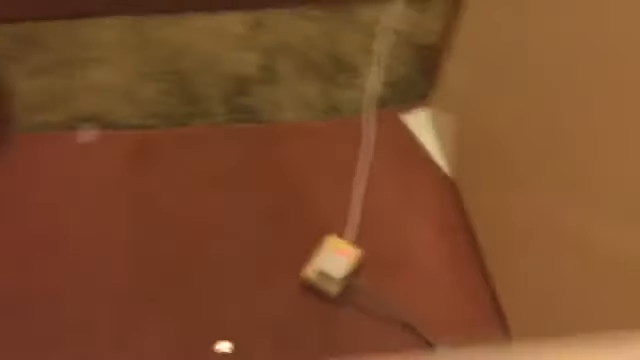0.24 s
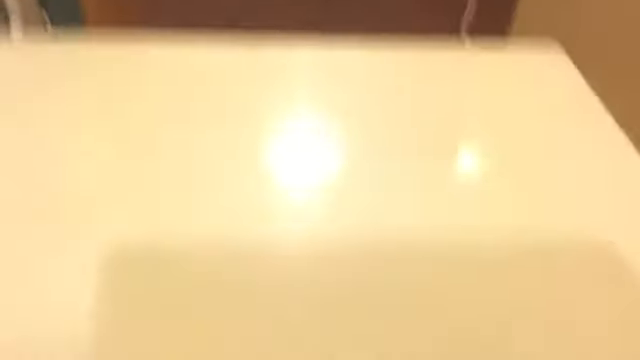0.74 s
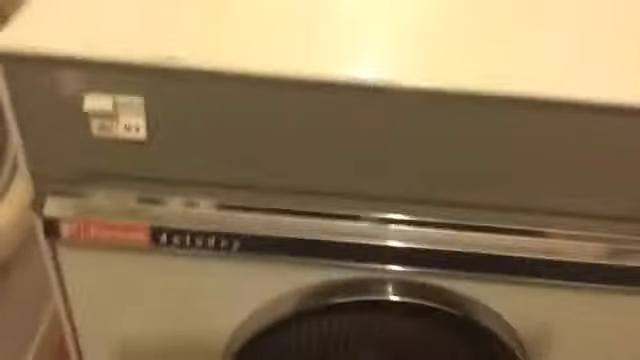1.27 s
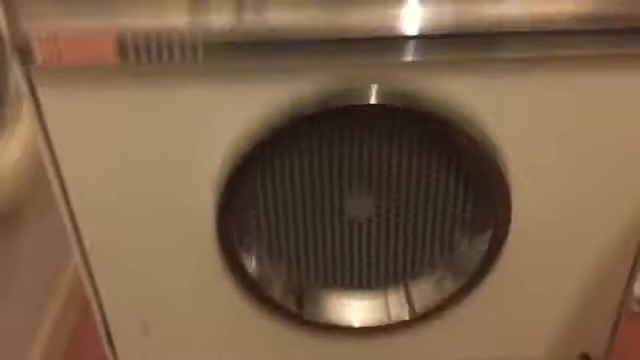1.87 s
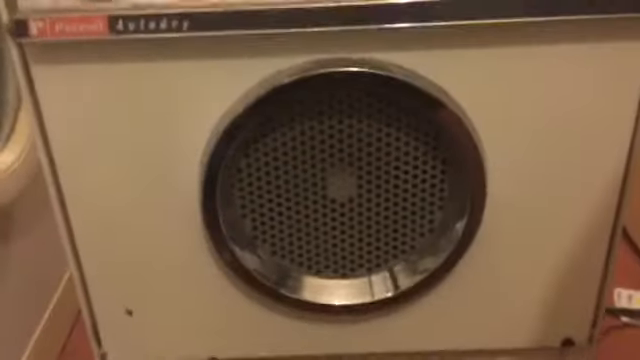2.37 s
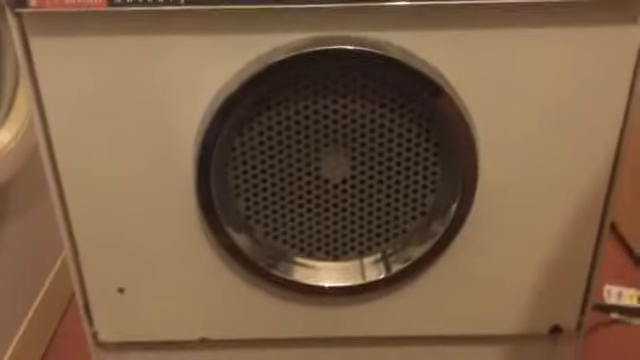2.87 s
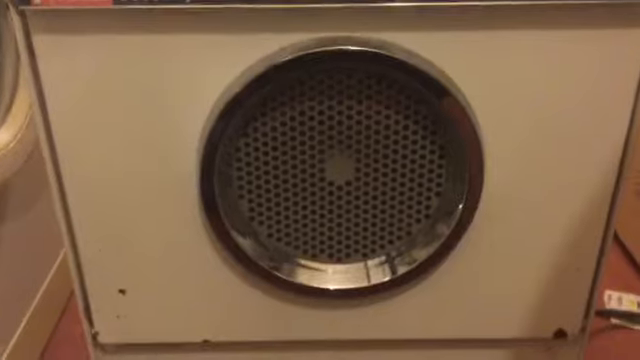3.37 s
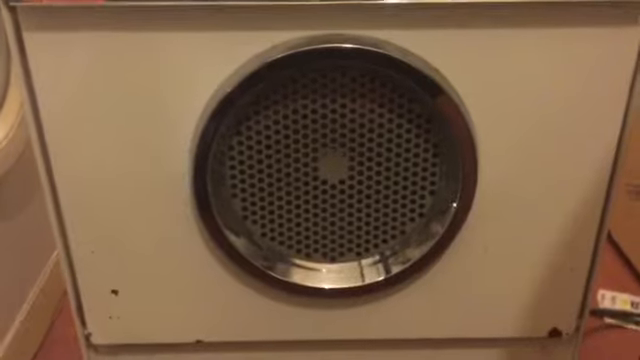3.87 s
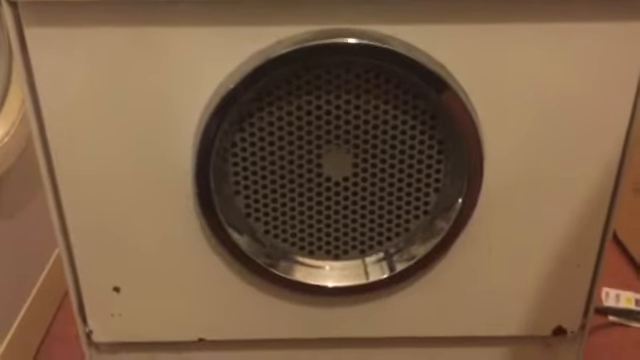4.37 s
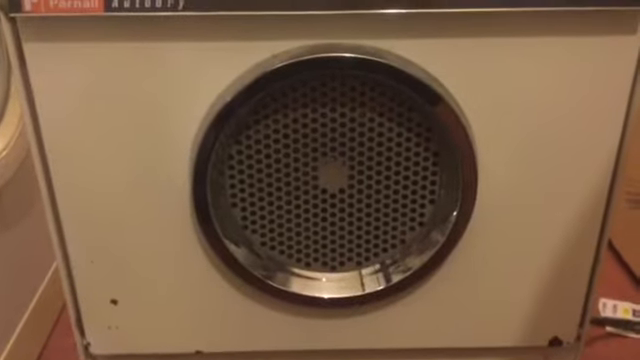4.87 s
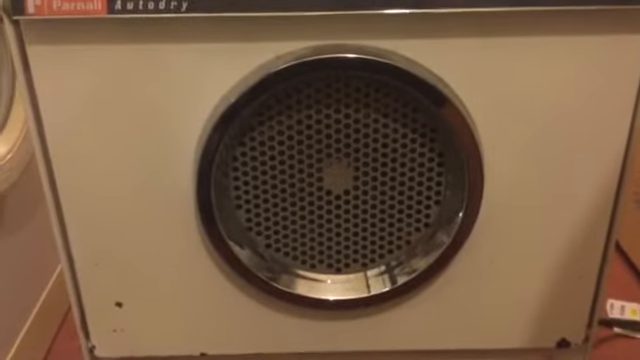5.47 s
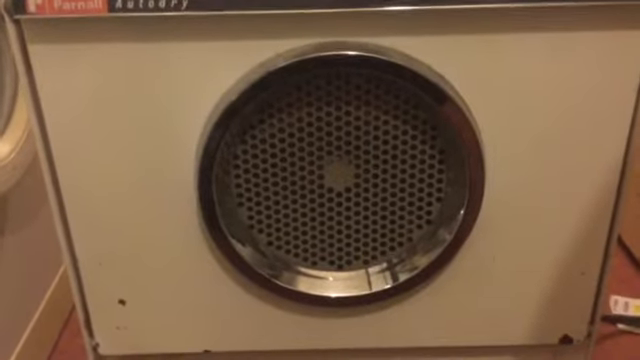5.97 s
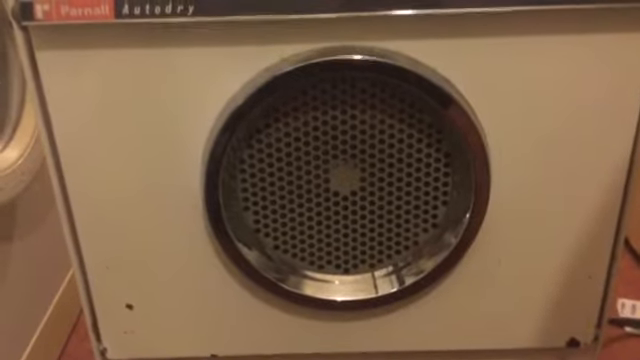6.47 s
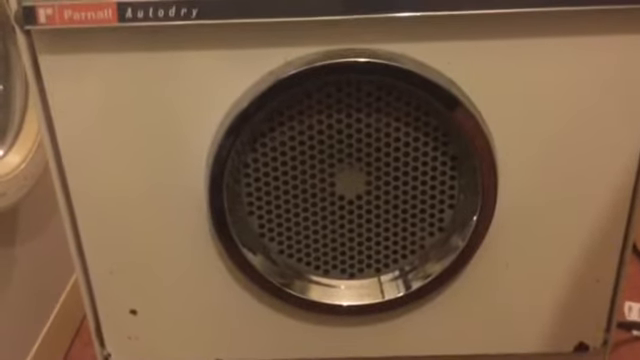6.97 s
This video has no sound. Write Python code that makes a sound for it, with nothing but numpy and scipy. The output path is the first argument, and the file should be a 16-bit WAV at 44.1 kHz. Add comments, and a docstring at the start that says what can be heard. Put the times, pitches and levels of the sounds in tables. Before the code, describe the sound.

A tumble dryer is already running and never stops, picked up close by a handheld phone in a small room. From 0 to 0.3 s soft airy rustles of handling lie over a deep electric hum, strongest near the rear; a low panel tone swells around 0.5 s and drops away by 0.9 s. As the phone comes round, fan air shifts, fine hiss and rattling fasteners rise between 0.8 and 2.4 s, and thin, bright ticks, a soft and a strong one about seven times a second, become clearer. Cloth flops irregularly throughout, with a button click near 2.4 s. By 3 s the sound settles, less hissy. Dull low thuds land near 3.2, 3.6, 5.5 and 5.8 s. Small clicks come at 3.9 and 4.2 s, a hollow note swells briefly at 4.9 s, cloth drops at 5.1 s, a sharper metallic snap pings at 6.3 s, and a fuller flop falls at 7.1 s.

```python
"""A phone is carried from behind a running tumble dryer round to its front, in a small room.
Throughout, summed tones hum, filtered noise gives drum rumble and fan, and noise bursts tick twice a roller turn.
First come rustles of banded noise and a swelling panel tone; then laundry drops as short bursts with struck
modes, while sine-ring buttons snap, fasteners rattle and a fine noise hiss swells until the phone settles.
Later, damped low sines thud from about three seconds, and a hollow note swells past the middle."""
import sys
import numpy as np
from scipy import signal
from scipy.fft import rfft, irfft
from scipy.io import wavfile
from scipy.ndimage import uniform_filter1d

SR = 44100
rng = np.random.default_rng(int(sys.argv[2]) if len(sys.argv) > 2 else 0)


def decibels_to_gain(level_db):
    """Convert a level in decibels to a linear amplitude gain (20 dB per decade)."""
    exponent = np.asarray(level_db, float) / 20
    return 10 ** exponent


def materialize(psi):
    """Save the field psi as 16-bit PCM at rate SR to the path in sys.argv[1].

    A 1-D psi becomes a single channel; in a 2-D psi each row is a channel.
    """
    bounded = np.clip(np.atleast_2d(psi).T, -1, 1)
    quanta = np.round(bounded * 32767).astype(np.int16)
    wavfile.write(sys.argv[1], SR, quanta)


N = 319284
T = np.arange(N) / SR  # [s]


def curves(rows):
    """Interpolate every column after the time column to a value per sample."""
    s, *columns = np.transpose(rows)
    return [np.interp(T, s, c) for c in columns]


def unit(x):
    """Scale to rms 1."""
    return x / np.sqrt(np.mean(x ** 2))


def colour(x, points, modes=()):
    """Filter by (Hz, dB) points, add resonances (Hz, width in Hz, dB), and scale to rms 1."""
    hz = np.arange(len(x) // 2 + 1) * SR / len(x) + 1
    power = 0
    if points:
        point_hz, point_db = np.transpose(points)
        power = decibels_to_gain(np.interp(np.log(hz), np.log(point_hz), point_db)) ** 2
    for f, w, db in modes:
        power = power + decibels_to_gain(db) ** 2 / (1 + (2 * (hz - f) / w) ** 2) ** 2
    return unit(irfft(rfft(x) * np.sqrt(power), len(x)))


def walk(rate):
    """Smooth random wander of rms 1, with a new random target rate times a second."""
    k = int(SR / rate)
    held = rng.standard_normal(N // 20)[np.arange(N) // k]
    return unit(uniform_filter1d(uniform_filter1d(held, k), k))


def bursts(times, peak_db, fade_s, rise_s):
    """Envelope of sudden rises and exponential fades."""
    env = np.zeros(N)
    for s, db, fade in zip(times, peak_db, fade_s):
        start = int(s * SR)
        t = T[start:int((s + 8 * fade) * SR)] - s
        env[start:start + len(t)] += decibels_to_gain(db) * np.exp(-t / fade) * np.clip(t / rise_s, 0, 1)
    return env


def ring(s, hz, db, cycles):
    """A sine struck at s, whose exponential fade has a time constant of the given number of cycles."""
    out = bursts([s], [db], [cycles / hz], 0.00023)
    on = np.flatnonzero(out)
    out[on] *= np.sin(2 * np.pi * hz * (T[on] - s))
    return out


def motor():
    """Magnetic pull and shaft unbalance; the fourth shaft multiple beats slowly against the mains hum."""
    # hum as the phone moves: (time [s], twice-mains hum level [dB], sixth shaft multiple level [dB])
    hum_levels = [(0, -44, -39), (.3, -35, -41), (.65, -38, -42), (1.1, -41.5, -47), (1.8, -42, -51),
                  (2.3, -42, -59), (3, -41, -62), (7.24, -41, -61)]
    # a rear panel rings as the phone passes it: (time [s], level [dB])
    panel_levels = [(0, -60), (.27, -52), (.33, -63), (.45, -53), (.56, -48), (.72, -52), (.85, -64),
                    (1.6, -66), (7.24, -71)]
    # steady motor tones: (times the hum frequency, times the shaft frequency, level [dB])
    steady_tones = [(0, 4, -48.5), (1, 1, -52.5), (0, 5, -59), (1, -1, -62), (1, -2, -60), (0, 7, -63),
                    (0, 8, -64.5), (0, 12, -68)]
    # rotor slot whine: (frequency [Hz], level [dB])
    slot_whine = [(882.9, -79)]
    hum_hz, shaft_hz = 99.95, 24.555  # the hum is at twice the mains
    in_step_s = 3.15  # hum and shaft phases are both zero here
    panel_hz, panel_wander_rad = 224, .88

    hum_phase = 2 * np.pi * hum_hz * (T - in_step_s)
    shaft_phase = 2 * np.pi * shaft_hz * (T - in_step_s)
    hum_db, sixth_db = curves(hum_levels)
    panel_db, = curves(panel_levels)
    out = decibels_to_gain(hum_db) * np.cos(hum_phase)
    out += decibels_to_gain(sixth_db + 0.77 * walk(12.0)) * np.cos(6 * shaft_phase)
    out += decibels_to_gain(panel_db) * np.cos(2 * np.pi * panel_hz * T + panel_wander_rad * walk(2.1))
    for m, k, db in steady_tones:
        level = decibels_to_gain(db + 1.2 * walk(2.04))
        out += level * np.cos(m * hum_phase + k * shaft_phase + .25 * walk(1.6))
    for hz, db in slot_whine:
        out += decibels_to_gain(db + 0.54 * walk(9.9)) * np.cos(2 * np.pi * hz * T + 0.16 * walk(4.7))
    return np.sqrt(2) * out  # makes the tone levels rms levels


def rumble():
    """The drum rolls on its bearings and shakes floor and cabinet panels; its air space sounds a hollow note."""
    # low shake of floor and panels: (frequency [Hz], relative level [dB])
    shake_colour = [(20, -23.5), (35, -11.5), (47, -8), (58, 0), (75, -0.5), (110, 2), (200, -32.5),
                    (1000, -91)]
    # drum roll as the phone comes round to the door: (time [s], level [dB])
    roll_levels = [(0, -46), (1.8, -46.5), (3.5, -44.5), (7.24, -45.5)]
    # broad colour of the roll: (frequency [Hz], relative level [dB])
    roll_colour = [(50, -37.5), (90, -3.5), (130, -0.5), (200, -5), (390, -8), (480, -35.5), (800, -59.5),
                   (2000, -94.5)]
    # cabinet resonances: (frequency [Hz], width [Hz], relative level [dB])
    cabinet_modes = [(100, 26, 8.5), (124, 14, 4), (151.6, 8.1, -2), (174.7, 10, -0.5), (295.2, 14, -9)]
    # swells of the hollow note: (time [s], peak level [dB], width [s])
    hollow_swells = [(4.62, -69, 0.046), (4.87, -58, 0.065)]
    shake_db, hollow_db = -50.5, -72

    shake = decibels_to_gain(shake_db + 2.1 * walk(12)) * colour(rng.standard_normal(N), shake_colour)
    roll_db = curves(roll_levels)[0] + 1.0 * walk(30) + 0.87 * walk(6)
    roll = decibels_to_gain(roll_db) * colour(rng.standard_normal(N), roll_colour, cabinet_modes)
    swell = decibels_to_gain(hollow_db + 2.2 * walk(9))
    for s, db, w in hollow_swells:
        swell = swell + decibels_to_gain(db) * np.exp(-((T - s) / w) ** 2)
    hollow = swell * colour(rng.standard_normal(N), (), [(694, 78, 2.5), (744, 130, -6.5)])
    return shake + roll + hollow


def ticks():
    """A strong and a soft tick every roller turn: grainy metal chatter with a short tail and a dull knock."""
    # strong tick as the phone comes round: (time [s], level [dB])
    tick_levels = [(0, -66), (.45, -77), (1, -66.5), (1.8, -62), (2.2, -65), (7.24, -65)]
    # bright metal colour: (frequency [Hz], relative level [dB])
    metal_colour = [(1500, -44), (3000, -23.5), (6000, -11), (8500, -4.5), (10500, -20.5), (12500, 5),
                    (14500, 6.5), (16000, -8)]
    turn_s, first_tick_s, soft_lead_s = .1439, .0985, .0345
    drift_s, drift_cycle_s, latest_s = .0027, 2.49, 2.19  # ticks drift late and early in a slow cycle
    soft_db, tail_db, knock_below_db = -10.5, -22.5, -9.5
    scatter_db, jitter_s = -2, 0.00072

    s = np.arange(first_tick_s, T[-1], turn_s)
    s = s + drift_s * np.cos(2 * np.pi * (s - latest_s) / drift_cycle_s)
    db = np.interp(s, *np.transpose(tick_levels))
    knock_db = np.r_[db, db] + knock_below_db  # equally heavy under strong and soft ticks
    s, db = np.r_[s, s - soft_lead_s], np.r_[db, db + soft_db]
    late, strong = rng.standard_normal((len(s), 2)).T
    s = s + jitter_s * late
    db = db + scatter_db * strong
    env = bursts(s, db, 0 * s + 0.006, 0.0012)
    env += bursts(s, db + tail_db, 0 * s + 0.05, 0.0079)
    chatter = rng.standard_normal(N) * decibels_to_gain(0.8 * walk(1000))
    knock = bursts(s, knock_db + scatter_db * strong, 0 * s + 0.007, .001)
    return env * colour(chatter, metal_colour) + knock * colour(chatter, (), [(3500, 4600, 0)])


def thuds():
    """The load thuds low in the drum: a couple of cycles of the cabinet's lowest panel."""
    # (time [s], level [dB])
    load_thuds = [(3.185, -30), (3.64, -34), (5.517, -33), (5.846, -32)]
    return sum(ring(s, 94.0, db, 1.3) for s, db in load_thuds)


def drops():
    """Cloth tumbles onto the drum wall in quick rough contacts, with a bright slap and unevenly struck modes."""
    # (time [s], body level before contact offsets [dB], slap level [dB], spread [s], body centre [Hz])
    laundry_drops = [(0.6744, -66, -85, .02, 1100), (0.78, -68, -90, .05, 2400),
                     (0.888, -61, -82, .055, 2000), (1.01, -68, -88, .05, 2600),
                     (1.085, -66, -82, .035, 2300), (1.389, -65, -70, .04, 1200),
                     (1.785, -61, -84, .045, 1400), (1.905, -60, -86, .035, 1850),
                     (2.37, -65, -85, .02, 2200), (2.4307, -65, -73, .02, 900), (2.544, -57, -86, .03, 800),
                     (2.6764, -64, -77, .02, 1900), (2.692, -65, -82, .015, 1900),
                     (2.815, -66, -90, .03, 2000), (3.03, -61, -82, .025, 1700),
                     (3.28, -59, -84, .04, 1450), (3.3972, -64, -85, .03, 1700),
                     (3.44, -64, -90, .035, 1700), (3.483, -65, -90, .02, 1500),
                     (3.692, -64, -88, .012, 2300), (3.8, -67, -82, .02, 2200), (4.2, -65, -84, .02, 1450),
                     (4.222, -56, -74, .03, 1600), (4.3126, -62, -90, .02, 1300),
                     (4.34, -61, -84, .025, 1200), (5.1192, -56, -68, .03, 1500),
                     (5.123, -61, -80, .03, 2900), (5.165, -58, -95, .04, 880), (5.22, -68, -84, .03, 1100),
                     (5.8705, -63, -83, .02, 1300), (6.247, -63, -82, .03, 1500),
                     (6.3699, -64, -78, .03, 1500), (6.515, -61, -84, .03, 1250),
                     (6.9734, -63, -76, .03, 1300), (7.1365, -53, -78, .025, 1700),
                     (7.142, -58, -86, .04, 1000), (7.144, -62, -90, .025, 3000)]
    # drum wall modes: (frequency [Hz], relative level [dB])
    wall_modes = [(870, 6.5), (1000, -3.5), (1170, 4.5), (1390, 1), (1560, -8.5), (1720, -3.5), (1950, -1),
                  (2400, -9.5), (3250, -8.5)]
    rise_s, contact_db, ring_db = .0035, -0.5, -2
    tumble_spread, tumble_octaves = .9, .8  # reach of the contacts in time (in spreads) and pitch
    body_width = 0.57  # over its centre frequency
    off_centre_db = -6.5  # loss of a wall mode an octave from the body centre

    s, db, slap_db, spreads, centre = np.transpose(laundry_drops)
    grain = rng.standard_normal(N) * decibels_to_gain(2.0 * walk(250))
    chance = rng.random((len(s), len(wall_modes), 2))
    contacts = rng.random((len(s), 4, 3))
    out = colour(grain, (), [(4500, 6000, 0)]) * bursts(s, slap_db, 0.6 * spreads, rise_s)
    for when, peak_db, spread, mid, row, touches in zip(s, db, spreads, centre, chance, contacts):
        start = int(when * SR)
        near = slice(min(start, N - 8192), min(start + 8192, N))
        touches = np.r_[[(0, 0, .5)], touches]  # the first contact is on time, full and centred
        for k, (late, weak, pitch) in enumerate(touches):
            hz = mid * 2 ** (tumble_octaves * (pitch - .5))
            after = (k + late) / len(touches) * tumble_spread  # in spreads
            touch_db = peak_db + contact_db - 7.0 * weak - 5.0 * after - 2.5 * (k > 0)
            env = bursts([when + after * spread], [touch_db], [spread / 3], rise_s)
            out[near] += colour(grain[near], (), [(hz, body_width * hz, 0)]) * env[near]
        for (hz, mode_db), (late, weak) in zip(wall_modes, row):
            off_db = off_centre_db * np.log2(hz / mid) ** 2
            struck_db = peak_db + ring_db + mode_db + off_db - 10.0 * weak
            out += ring(when + spread * late, hz, struck_db, 16.0)
    return out


def snaps():
    """Buttons snap on metal: dry broad clicks a millisecond or two long, each with a short ping."""
    # (time [s], click level [dB], ring frequency [Hz], ring level [dB])
    button_snaps = [(.34, -92, 2000, -62), (0.8187, -89, 2690, -57.5), (2.4326, -65, 2900, -58),
                    (3.896, -59.5, 5430, -75), (4.2247, -70, 5370, -59), (4.226, -84, 4100, -65),
                    (4.344, -81, 3550, -64.5), (4.474, -72, 3500, -63), (5.1207, -73, 5300, -65),
                    (6.3333, -63, 3000, -51), (6.333, -80, 1610, -59), (6.373, -74, 3200, -63)]
    s, db = np.transpose(button_snaps)[:2]
    clicks = colour(rng.standard_normal(N), (), [(7300, 33000, 0)]) * bursts(s, db, 0 * s + 0.0022, 0.00024)
    return clicks + sum(ring(when, hz, ring_db, 11) for when, _, hz, ring_db in button_snaps)


def rattles(level_db, count):
    """Many tiny fasteners and seams touch the drum, each ringing a moment at its own pitch."""
    when, pitch, size, cycles = rng.random((count, 4)).T
    hz = 800. * 7. ** pitch ** 1.3
    # a few large, many small; duller ones stronger
    gain = decibels_to_gain(-2.8 * np.log(size + 0.014) - 4.5 * np.log2(hz / 2000))
    fades = (2. + 24. * cycles) / hz  # [s]
    out, t = np.zeros(N + 4096), T[:4096]
    for i, f, g, fade in zip((when * N).astype(int), hz, gain, fades):
        env = np.exp(-t / fade) * np.clip(4 * t / fade, 0, 1)
        out[i:i + 4096] += g * np.sin(2 * np.pi * f * t) * env
    clumped = out[:N] * decibels_to_gain(2.2 * walk(14))  # they come in clumps
    return decibels_to_gain(level_db) * unit(clumped)


def rustles():
    """Airy rustles as the phone is lifted: soft grainy swells of noise, each in its own band."""
    # (time [s], peak level [dB], width [s], centre [Hz], bandwidth [Hz])
    lift_rustles = [(.03, -69, 0.093, 1700, 1300), (.13, -75, 0.028, 1780, 1200),
                    (.24, -83.5, 0.1, 5750, 2000), (.26, -68, 0.034, 1370, 1190)]
    grain = rng.standard_normal(N) * decibels_to_gain(1.4 * walk(60))
    out = np.zeros(N)
    for s, db, w, hz, wide_hz in lift_rustles:
        swell = decibels_to_gain(db) * np.exp(-((T - s) / w) ** 2)
        out += swell * colour(grain, (), [(hz, wide_hz, 0)])
    return out


def air(level_db):
    """Fan noise through the duct, plus the patter of cloth, which flickers band by band."""
    # broad colour of the fan: (frequency [Hz], relative level [dB])
    fan_colour = [(260, -25.5), (450, 5), (547, -1.5), (679, 0.5), (774, -15.5), (862, -2.5), (1040, -12),
                  (1160, -8.5), (1300, -13), (1560, -9.5), (6000, -35.5), (7800, -60.5), (13200, -120)]
    # duct resonances: (frequency [Hz], width [Hz], relative level [dB])
    duct_modes = [(804, 150, -4), (1154, 36, -5.5)]
    shared, out = walk(12.0), 0
    for hz in 450 * 2 ** np.arange(0, 4, .5):
        band = colour(rng.standard_normal(N), (), [(hz, hz / 1.53, 0)])
        depth = min(hz / 720.0, 1)  # cloth is heard more in the upper bands
        flicker_db = depth * (1.5 * shared + 2.2 * walk(22)) + 1.2 * walk(6)
        out = out + np.sqrt(hz) * band * decibels_to_gain(flicker_db)
    return decibels_to_gain(level_db) * colour(out, [(250, -33.5)] + fan_colour, duct_modes)


def hiss(level_db):
    """A fine hiss: noise up to the top of the band, at a gently wandering level."""
    # (frequency [Hz], relative level [dB])
    hiss_colour = [(1760, -9.5), (3000, -2.5), (5100, -3.5), (7340, -6.5), (8360, -5.5), (10100, -6),
                   (13800, -8.5), (15500, -11)]
    return decibels_to_gain(level_db + 1.5 * walk(12)) * colour(rng.standard_normal(N), hiss_colour)


def scene():
    """Sum all sources into one channel, with the upper layers following the phone's move."""
    # (time [s], fan level [dB], hiss level [dB], small rattles level [dB])
    upper_levels = [(0, -63.5, -73.5, -87), (.2, -62.5, -80, -80), (.5, -64, -83.5, -79.5),
                    (.8, -66, -79, -71), (1.05, -61.5, -77.5, -74), (1.27, -66.5, -74.5, -69),
                    (1.4, -62.5, -74.5, -71.5), (1.6, -65, -75.5, -71), (2.35, -64, -77, -71.5),
                    (2.9, -64, -84.5, -76), (7.24, -65.5, -86, -76)]
    air_db, hiss_db, rattle_db = curves(upper_levels)
    machine = motor() + rumble() + air(air_db) + ticks()
    laundry = thuds() + drops() + snaps() + rattles(rattle_db, count=6000)
    return (machine + laundry + rustles() + hiss(hiss_db))[None]


def roll_off(x):
    """The treble ends steeply here."""
    return signal.sosfilt(signal.butter(12, 15680, fs=SR, output="sos"), x)


def record(dry):
    """A short fade-in starts the sound without a click, and a steep low-pass cuts the top."""
    faded_in = dry * np.sin(np.pi / 2 * np.minimum(T / .006, 1)) ** 2
    low_pass = signal.ellip(8, .2, 60, 15400, fs=SR, output="sos")  # ripple and stopband in dB, edge in Hz
    mix = signal.sosfilt(low_pass, faded_in)
    return roll_off(mix)


dry = scene()
out = record(dry)
materialize(out)
```